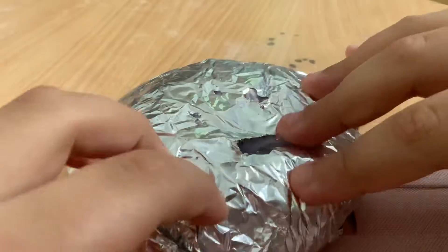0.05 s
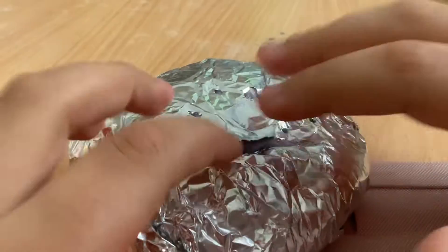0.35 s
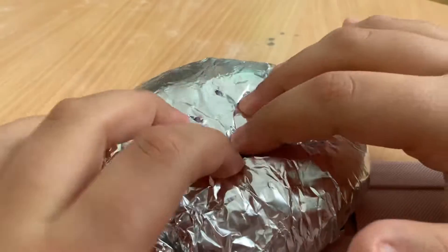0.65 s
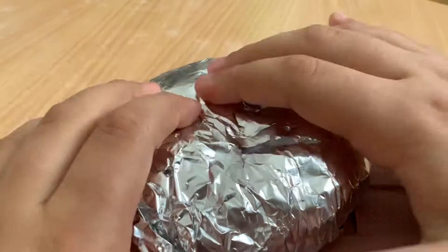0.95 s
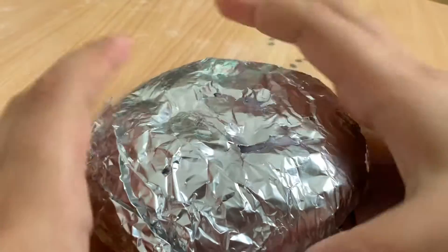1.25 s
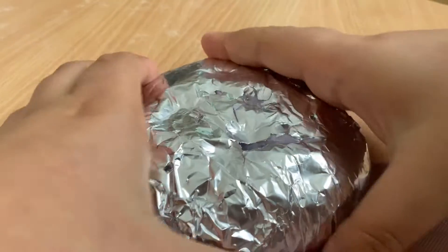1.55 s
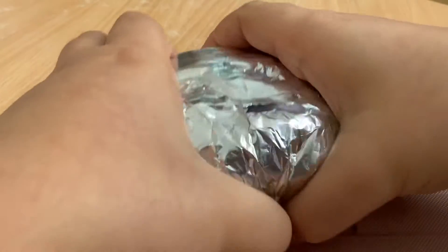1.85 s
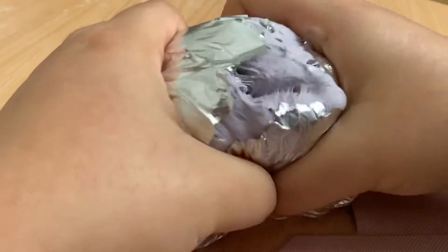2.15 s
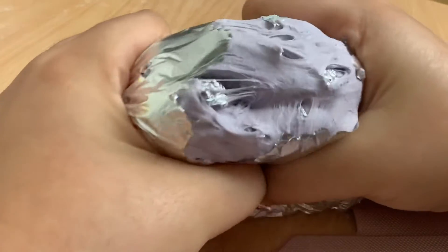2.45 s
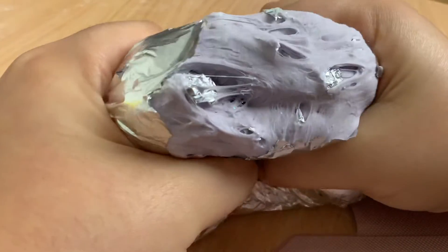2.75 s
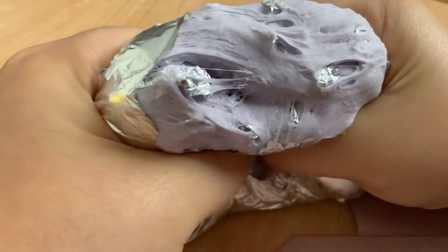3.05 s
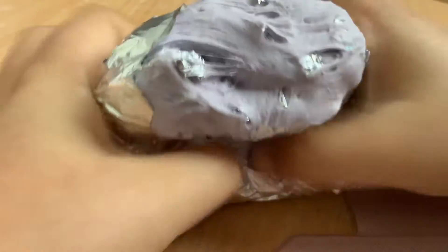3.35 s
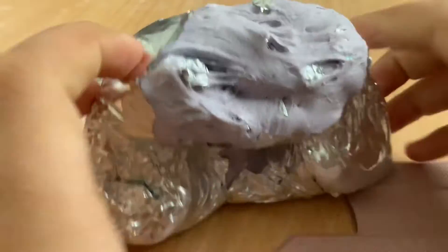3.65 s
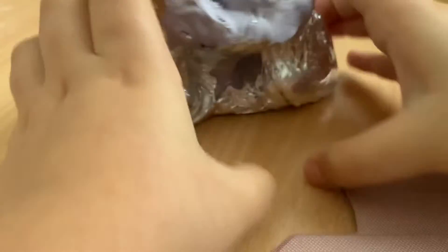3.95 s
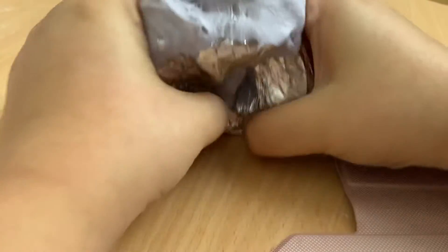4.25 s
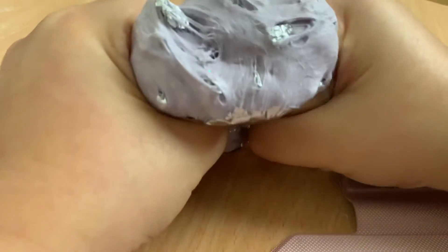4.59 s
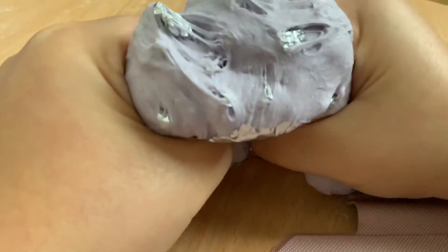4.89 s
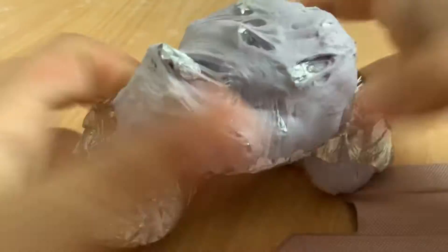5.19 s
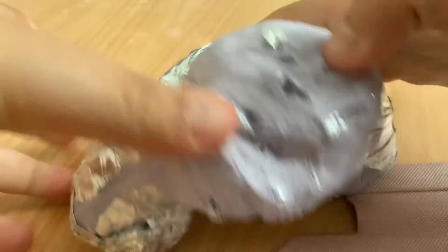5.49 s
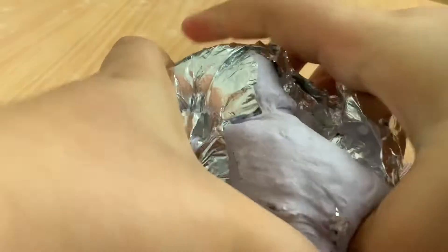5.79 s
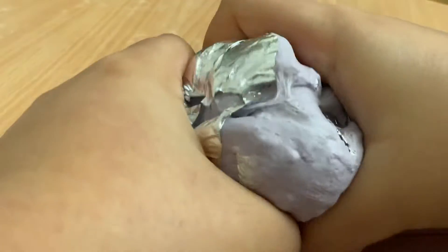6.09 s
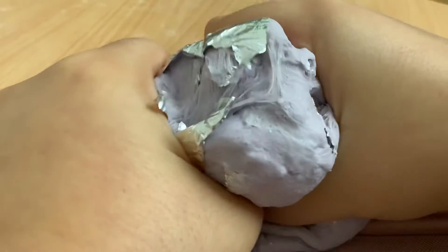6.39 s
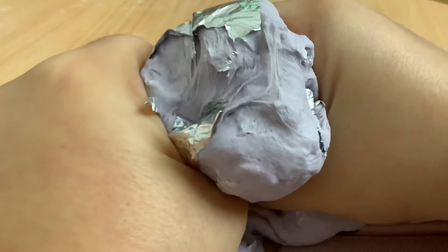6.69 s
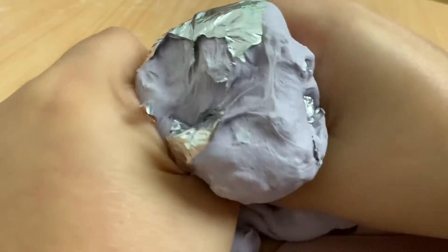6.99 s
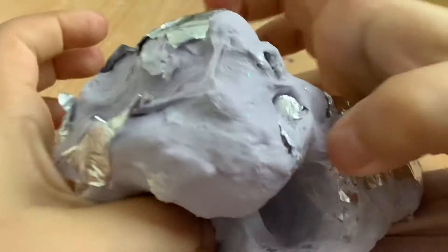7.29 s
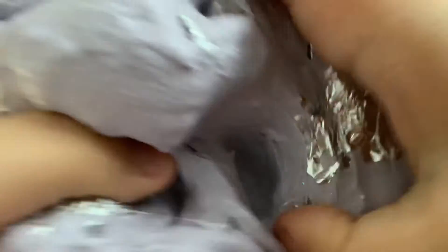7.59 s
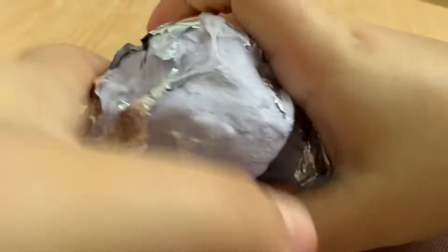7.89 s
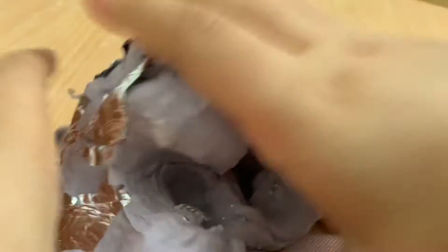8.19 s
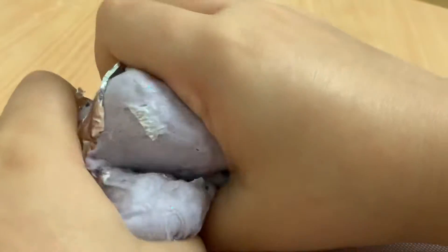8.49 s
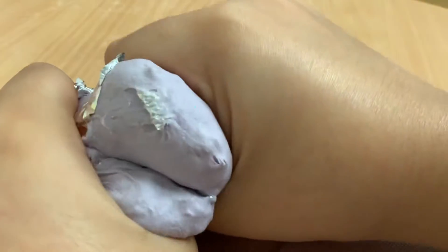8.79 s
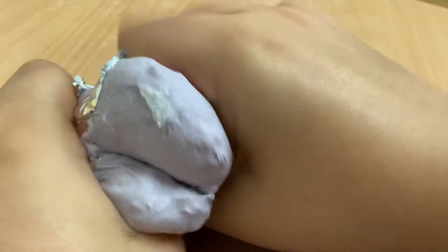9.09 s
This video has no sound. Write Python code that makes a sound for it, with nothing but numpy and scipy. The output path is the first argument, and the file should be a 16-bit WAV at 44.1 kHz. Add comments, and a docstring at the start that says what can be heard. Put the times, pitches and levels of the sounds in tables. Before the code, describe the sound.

Hands squeeze foil-wrapped putty in uneven bursts of bright crinkling and snaps, with soft squelches and dull bumps on a table.

```python
"""Squeezing putty in foil

Two hands squeeze a lump of soft putty wrapped in aluminium foil, close up on a wooden table in a small
room. The foil buckles in bright snaps and showers of tiny creases; early on the wrap is crushed and
bursts, and the bared putty is stretched. Underneath, skin sticks and slips, trapped air squelches out,
and now and then the lump bumps the table."""
import sys
import numpy as np
from scipy import signal
from scipy.fft import rfft, irfft
from scipy.io import wavfile
from scipy.ndimage import uniform_filter1d, map_coordinates

SR = 44100
rng = np.random.default_rng(int(sys.argv[2]) if len(sys.argv) > 2 else 0)


def dump(signal):
    """Clip the signal to [-1, 1] and save it as 16-bit WAV at the path in sys.argv[1]."""
    limited = np.clip(np.atleast_2d(signal).T, -1, 1)
    pcm = np.round(limited * 32767).astype(np.int16)
    wavfile.write(sys.argv[1], SR, pcm)


N = 403074
TIME = np.arange(N) / SR

# Levels in the tables are fader settings; each layer adds its own trim.
# grips of the hands: t/s at full force, closing/s, hold/s, release/s,
# foil level/dB, skin level/dB, putty level/dB, table level/dB, creasing pace/(1/s)
HAND_GRIPS = [(0.047, 0.007, 0.0046, 0.023, -39, -50, -60, -43.5, 420),
              (0.11, 0.055, 0.1, 0.092, -47, -63.5, -79, -59, 310),
              (0.383, 0.11, 0.01, 0.023, -38, -49, -51, -45.5, 930),
              (0.43, 0.017, 0.0054, 0.038, -38.5, -55, -63, -49, 490),
              (0.591, 0.23, 0.078, 0.034, -57, -67, -77, -59.5, 370),
              (0.83, 0.07, 0.0064, 0.04, -39.5, -49, -52, -51, 1400),
              (0.911, 0.01, 0.0076, 0.0099, -40.5, -43.5, -64, -49, 3000),
              (0.941, 0.051, 0.068, 0.16, -50.5, -66, -51.5, -53, 370),
              (1.282, 0.13, 0.012, 0.16, -44, -53.5, -51, -54, 900),
              (1.474, 0.21, 0.028, 0.076, -58.5, -62, -58.5, -57, 11000),
              (1.738, 0.21, 0.08, 0.074, -34.5, -56, -56.5, -62, 1400),
              (1.856, 0.061, 0.13, 0.2, -34, -45.5, -51, -74.5, 4000),
              (2.11, 0.41, 0.33, 0.14, -40, -50.5, -53.5, -54.5, 1400),
              (2.62, 0.37, 0.26, 0.16, -41.5, -51.5, -57, -75, 2000),
              (3.011, 0.041, 0.019, 0.25, -47, -54, -53.5, -66, 1300),
              (3.362, 0.15, 0.031, 0.13, -34, -39.5, -40.5, -43, 4700),
              (3.61, 0.49, 0.0074, 0.11, -52.5, -50, -46.5, -50, 6000),
              (3.758, 0.092, 0.017, 0.13, -32.5, -42.5, -42.5, -55, 19000),
              (3.844, 0.11, 0.06, 0.24, -38.5, -45, -44, -58, 15000),
              (4.083, 0.11, 0.095, 0.092, -53.5, -52.5, -45.5, -67, 11000),
              (4.183, 0.071, 0.15, 0.35, -36.5, -44, -44, -59, 8000),
              (4.41, 0.062, 0.071, 0.17, -41.5, -46, -45.5, -53, 1600),
              (4.624, 0.35, 0.22, 0.33, -40.5, -49.5, -55, -62, 2000),
              (5.096, 0.083, 0.014, 0.23, -37, -44.5, -47, -48.5, 2300),
              (5.409, 0.19, 0.08, 0.079, -42, -37, -33.5, -36, 750),
              (5.598, 0.27, 0.091, 0.075, -36.5, -49.5, -36, -42, 910),
              (5.742, 0.02, 0.14, 0.13, -43, -53.5, -52.5, -49, 1100),
              (5.931, 0.023, 0.2, 0.3, -36.5, -52, -50.5, -68, 3400),
              (6.251, 0.046, 0.16, 0.15, -37, -53, -49.5, -53, 950),
              (6.506, 0.022, 0.22, 0.11, -52, -59.5, -66, -57, 680),
              (6.83, 0.066, 0.18, 0.21, -54.5, -61.5, -65.5, -61, 190),
              (7.046, 0.15, 0.059, 0.22, -39.5, -54, -49.5, -54.5, 5300),
              (7.21, 0.3, 0.19, 0.25, -51.5, -60.5, -57.5, -51, 1740),
              (7.699, 0.054, 0.012, 0.18, -38, -50, -37, -41.5, 1400),
              (7.853, 0.047, 0.0095, 0.37, -44.5, -56, -44.5, -43, 3700),
              (8.032, 0.015, 0.0099, 0.062, -63, -70, -48.5, -45, 2000),
              (8.188, 0.0077, 0.0051, 0.017, -32.5, -57, -49, -58, 12000),
              (8.23, 0.16, 0.096, 0.53, -48.5, -47, -41, -46.5, 5300),
              (8.493, 0.22, 0.058, 0.56, -41.5, -55.5, -70, -52.5, 1200),
              (8.899, 0.021, 0.0086, 0.073, -39, -44, -49.5, -39, 2500),
              (9.136, 0.073, 0.02, 0.075, -35.5, -35, -37.5, -38, 1800)]
# the lump hits the table: t/s, level/dB, start f/Hz, end f/Hz
TABLE_BUMPS = [(0.059, -26.5, 177, 75.5), (0.914, -24.5, 293, 77.4), (1.351, -23.5, 332, 99),
               (2.068, -17.5, 1128, 142), (2.077, -24.5, 204, 120), (2.307, -27, 465, 157),
               (2.566, -26.5, 747, 126), (2.751, -31, 320, 143), (3.431, -28, 697, 178),
               (3.618, -31, 355, 99), (4.478, -21, 633, 141), (5.106, -26, 230, 154),
               (5.186, -26.5, 557, 127), (5.47, -21.5, 252, 130), (5.62, -18.5, 203, 144),
               (5.644, -19.5, 231, 157), (6.287, -23, 407, 68.6), (6.521, -25.5, 237, 139),
               (7.252, -36.5, 414, 68), (7.685, -11, 513, 294), (7.715, -23, 106, 63),
               (8.22, -24, 221, 129)]
# air escapes through a gap: t/s, length/s, level/dB, pocket f/Hz
AIR_SQUELCHES = [(0.378, 0.0033, -45, 940), (0.829, 0.0026, -36.5, 990), (1.288, 0.0016, -27.5, 840),
                 (2.201, 0.016, -34, 1920), (2.566, 0.0031, -33.5, 1150), (3.375, 0.0057, -30, 2000),
                 (3.428, 0.002, -25.5, 1000), (4.406, 0.0054, -18, 1820), (4.41, 0.0029, -23.5, 1030),
                 (4.433, 0.0047, -33, 2100), (5.329, 0.033, -37, 1180), (5.367, 0.0044, -35, 1160),
                 (5.396, 0.0042, -22.5, 1064), (5.397, 0.0051, -26, 1440), (5.408, 0.005, -23.5, 1130),
                 (5.431, 0.027, -32, 1160), (5.454, 0.018, -30, 1140), (5.471, 0.028, -29.5, 1160),
                 (5.561, 0.0085, -40, 1060), (5.577, 0.022, -42.5, 1150), (5.66, 0.0041, -38.5, 1150),
                 (5.74, 0.0058, -47, 1150), (5.825, 0.0031, -37.5, 1250), (7.706, 0.0056, -40.5, 1090),
                 (8.122, 0.047, -41, 1740), (8.123, 0.039, -37.5, 360), (8.161, 0.053, -45.5, 3410),
                 (8.166, 0.011, -31.5, 1880), (8.184, 0.04, -41.5, 1960)]
# the featured buckles of the foil: t/s, level/dB, facet f/Hz, relative midrange pop level/dB
FOIL_SNAPS = [(0.0521, -35.5, 8500, -25), (0.0707, -32, 12100, -42), (0.1245, -32.5, 8450, -37),
              (0.1312, -31, 10500, -26), (0.1332, -29.5, 7850, -20), (0.1751, -34.5, 7860, -31),
              (0.1997, -36, 8000, -35), (0.2078, -24, 9570, -47), (0.229, -32.5, 12600, -30),
              (0.321, -33, 10700, -37), (0.3436, -41, 7560, -32), (0.4976, -39, 8700, -20),
              (0.5238, -21.5, 12970, -42), (0.5698, -37, 9700, -27), (0.5866, -45, 9600, -20),
              (0.6868, -50, 8340, -14), (0.7773, -41, 7960, -40), (0.79, -32.5, 11700, -47),
              (0.829, -30.5, 9710, -30), (0.9505, -32.5, 7400, -33), (0.9952, -32.5, 10450, -37),
              (1.0534, -36.5, 11800, -18.5), (1.2155, -41, 9200, -14), (1.2714, -35.5, 11450, -18),
              (1.2896, -32, 9300, -1.5), (1.35, -49.5, 9600, -10), (1.6635, -40, 11200, -35),
              (1.6906, -41, 10800, -25), (1.7162, -28.5, 10200, -19), (1.7472, -23, 10240, -25),
              (1.7528, -28, 9700, -24), (1.7617, -24, 9100, -18), (1.7794, -31, 9200, -21),
              (1.8024, -26.5, 9100, -1), (1.8262, -26, 8400, -29), (1.8429, -28, 8950, -18),
              (1.8489, -20, 8400, -9), (1.8794, -26, 9400, -19), (1.8891, -24.5, 9200, -4.5),
              (1.9255, -25, 9900, -17), (1.9334, -24, 9500, -22), (1.9369, -19.5, 9900, -8),
              (1.9558, -22, 9500, -7), (1.9608, -14, 10600, -15.5), (1.9637, -27, 9400, -2.5),
              (1.9675, -18, 10300, -10.5), (1.9921, -22, 10100, -12), (2.009, -24, 9100, -33),
              (2.0197, -30, 9000, -21), (2.0284, -18, 8350, -21), (2.0512, -27, 10400, -23),
              (2.0684, -24, 8050, -8), (2.081, -22.5, 9350, -37), (2.1117, -33, 8850, -16),
              (2.1627, -27, 10000, -40), (2.1774, -23.5, 11300, -12.5), (2.2231, -37, 12100, -20),
              (2.234, -30, 8640, -5.5), (2.3117, -22, 8460, -13), (2.3263, -23, 14000, -32),
              (2.35, -32, 12000, -12), (2.3626, -25, 9200, -15), (2.4156, -28, 11700, -27),
              (2.4951, -31.5, 6060, 1.5), (2.5045, -37.5, 11100, -4), (2.5684, -32.5, 9500, 2),
              (2.6603, -31.5, 14400, -12), (2.6896, -38, 9800, -16), (2.7925, -40, 11900, -18),
              (2.8504, -33.5, 10820, -21), (2.9638, -34.5, 10600, -26), (2.9747, -34.5, 9900, -9),
              (3.0411, -37, 10300, -24), (3.079, -30.5, 13000, -28), (3.4219, -25, 9400, -9),
              (3.431, -25, 8300, -1), (3.6016, -24, 10200, -20), (3.611, -29, 9200, -17),
              (3.6554, -27, 8240, -23), (3.7024, -35.5, 11000, -18), (3.9836, -36, 11000, -27),
              (4.1647, -29, 9450, -23), (4.2897, -29.5, 12000, -11), (4.3802, -28, 8900, -11),
              (4.404, -21, 11100, -16), (4.5216, -41, 9000, 2.5), (4.5617, -35, 11500, -22),
              (4.6135, -25, 12100, -7), (4.6297, -28, 12000, -31), (4.6575, -29, 10800, -10),
              (4.6814, -21, 10860, -20), (4.6917, -37, 10800, -13), (4.7082, -40, 11000, -20),
              (4.732, -22, 12500, -30), (4.7554, -43.5, 7450, 5), (4.8331, -31.5, 7800, -14),
              (4.8608, -36, 10000, -6), (4.8827, -39, 7030, -5), (4.963, -37, 8000, -28),
              (5.0423, -39, 10970, -29), (5.106, -34, 12000, -25), (5.1645, -46, 6700, -4),
              (5.1697, -32, 9900, -6), (5.3962, -25, 6370, -2.5), (5.5588, -32, 8860, -24),
              (5.611, -27, 10600, -16), (5.6241, -36, 10900, -25), (5.6528, -26, 11200, -31),
              (5.6737, -32, 11100, -13), (5.7786, -36, 10200, -25), (5.826, -38, 11800, -16),
              (5.8875, -35.5, 11740, -25), (5.9122, -27.5, 9300, -17), (5.9205, -30, 12100, -20),
              (5.9382, -35, 11000, -15), (6.0238, -42, 9900, -25), (6.0717, -39, 10900, 3.5),
              (6.2535, -25.5, 11100, -12.5), (6.3048, -30, 12200, -32), (6.312, -22, 9800, -8.5),
              (6.3659, -25, 9600, -6.5), (6.373, -25.5, 9700, -6), (6.3945, -31, 11300, -11),
              (6.4342, -28.5, 11300, -10.5), (6.5064, -27.5, 11000, -15), (6.5119, -34.5, 8850, 7),
              (6.6057, -33.5, 11700, -11), (6.6734, -38, 5400, -9.5), (6.8436, -43.5, 9900, -7),
              (7.0323, -35, 12000, -9), (7.0928, -31, 8950, -10), (7.1126, -32.5, 5300, -19),
              (7.5327, -32, 13330, -22), (7.555, -41, 5100, -16), (7.9015, -38, 10500, -14),
              (7.9614, -48, 8500, -17), (8.018, -32, 10950, -9), (8.3807, -41.5, 9500, -28),
              (8.5512, -31, 9600, -20), (8.6429, -34.5, 6530, -8), (8.7771, -40.5, 11000, -26),
              (9.121, -28.5, 8360, -13)]
# fader moves for the bursting wrap and the stretching putty: t/s, level/dB
CRUSH_FADER = [(1.68, -56), (1.74, -38), (1.86, -29.5), (1.97, -27.5), (1.985, -45), (2.035, -21.5),
               (2.06, -38), (2.12, -30), (2.17, -66)]
STRETCH_FADER = [(2.42, -53), (2.55, -44), (2.6, -40.5), (2.72, -45), (2.79, -42.5), (2.93, -58.5),
                 (3.03, -51.5), (3.16, -63)]
# EQ curves of room tone, crinkle and snaps: f/Hz, level/dB
ROOM_TONE_EQ = [(25, -7), (60, -10), (150, -9), (400, -18), (1000, -33), (2700, -35), (6000, -35),
                (16000, -34.5)]
CRINKLE_EQ = [(300, -52), (1000, -9), (1800, -0.5), (2700, 0.5), (3700, 1), (5000, 0.5), (7000, 0.5),
              (9000, 3), (11500, 2.5), (15500, -2.5), (16500, -37)]
SNAP_EQ = [(300, -6.5), (1000, -1), (2000, -9), (2700, -3), (3800, 4), (5500, 1.5), (9000, 0.5),
           (16000, 3.5)]
# resonances of table, putty, gaps under the skin, cupped hands and closed wrap: f/Hz, width/Hz, level/dB
TABLE_RESONANCES = [(50, 28, -5.5), (68.5, 21.6, -1.3)]
PUTTY_RESONANCES = [(164, 24, -1), (239.5, 14, -6), (317, 44, -4.5)]
GAP_RESONANCES = [(537, 113, 7), (879, 110, 3.5), (1029, 158, 4), (1613, 214, 7.5), (1750, 437, 7.5),
                  (1997, 800, 1)]
CUP_RESONANCES = [(315, 37, -0.5), (543, 30, 1.5), (836, 35, -1), (1006, 62, -9), (1200, 44, -6),
                  (1780, 65, -7.5), (1980, 120, -4.5), (2110, 760, -6.5)]
WRAP_RESONANCES = [(990, 110, -5.5), (2140, 660, -6), (3680, 400, -4.5), (6740, 410, -5), (8150, 700, 0),
                   (9550, 860, -1.5), (10800, 1000, -9.5), (13500, 3000, -9)]
# partials of an air pocket: multiple of its pitch, level/dB
POCKET_PARTIALS = [(1, 10), (2, -5.5)]

TOP_HZ = 15900  # upper edge of the mix
SLIDING_PACE = 1900  # at this pace the foil starts to slide: half as many chance buckles


def from_db(db):
    """Decibels to gain."""
    return 10 ** (np.asarray(db) / 20)


def rms_one(x):
    """Scale to rms 1."""
    return x / np.sqrt(np.mean(x ** 2) + 1e-20)


def add(track, s, sound):
    """Drop a short sound onto a track at s seconds."""
    i = max(round(s * SR), 0)
    track[..., i:i + sound.shape[-1]] += sound[..., :max(N - i, 0)]


def cut(x, hz, kind, order=2):
    """Butterworth filter; kind names the band that passes."""
    return signal.sosfilt(signal.butter(order, np.clip(hz, 10, .49 * SR), kind, fs=SR, output="sos"), x)


def resonate(x, hz, width_hz):
    """One resonance, unity gain at its peak."""
    r = np.exp(-np.pi * width_hz / SR)
    feedback = [1, -2 * r * np.cos(2 * np.pi * hz / SR), r * r]
    return signal.lfilter(np.array([1, 0, -1]) * (1 - r * r) / 2, feedback, x + 1e-18)


def body(x, modes):
    """Parallel resonances of alternating polarity; rms 1."""
    return rms_one(sum((-1) ** k * from_db(db) * resonate(x, hz, width)
                       for k, (hz, width, db) in enumerate(modes)))


def equalise(x, curve, size=2048):
    """Minimum-phase EQ, its curve drawn on a log-frequency axis."""
    hz, db = np.transpose(curve)
    bins_hz = np.maximum(np.fft.rfftfreq(size, 1 / SR), 1)
    gain = from_db(np.interp(np.log(bins_hz), np.log(hz), db))
    cepstrum = irfft(np.log(gain))
    cepstrum[1:size // 2] *= 2
    cepstrum[size // 2 + 1:] = 0
    impulse = irfft(np.exp(rfft(cepstrum)))
    return signal.fftconvolve(x, impulse[None], axes=-1)[:, :x.shape[-1]]


def bend(x, pitch_ratio):
    """Varispeed: shift all resonances by a moving ratio."""
    position = np.cumsum(pitch_ratio)
    return np.array([map_coordinates(side, [position], order=1, mode="mirror") for side in x])


def fader(points):
    """Gain from (t/s, level/dB) points; silent outside them."""
    s, db = np.transpose(points)
    return from_db(np.interp(TIME, s, db, left=-120, right=-120))


def drift(per_s):
    """A slow random wander, roughly between -1 and 1."""
    return np.interp(TIME * per_s, np.arange(1000), rng.standard_normal(1000))


def stereo_noise(length, side_db):
    """Mid/side white noise; side_db sets the width."""
    mid, side = rng.standard_normal((2, length))
    return (mid + from_db(side_db) * side * [[1], [-1]]) / np.hypot(1, from_db(side_db))


def grain_power(per_s, spread_db, decay_s, even_s):
    """Power of fast-dying random grains, many small and a few big, levelled to about 1 over even_s."""
    chance = rng.random(N) * SR / per_s
    born = chance < 1
    strength = np.minimum(-np.log(chance[born] + 1e-12), 4)
    power = np.zeros(N)
    power[born] = from_db(spread_db * strength) ** 2
    power = signal.lfilter([1], [1, -np.exp(-2 / (decay_s * SR))], power + 1e-12)
    return power / np.maximum(uniform_filter1d(power, int(even_s * SR) + 1), 1e-9)


def room_tone():
    """The bed: faint, steady rumble and hiss."""
    return from_db(-59.5) * rms_one(equalise(stereo_noise(N, side_db=-12), ROOM_TONE_EQ))


def room(x, wet_db, t60_s=0.07):
    """Add a tight wash of reflections, different in each ear, just behind the direct sound."""
    t = TIME[:SR // 2]
    fade_in = np.clip(t / 0.0017 - .5, 0, 1)
    tail = rng.standard_normal((2, len(t))) * from_db(-60 * t / t60_s) * fade_in
    tail = rms_one(tail) / np.sqrt(len(t))
    return x + from_db(wet_db) * signal.fftconvolve(x, tail, axes=-1)[:, :N]


def grips(yield_db_per_s=12):
    """Grips close, hold while the lump yields, and let go: foil, skin, putty and table gains, and pace."""
    power, weighted_pace = np.zeros((4, N)) + 1e-12, np.zeros(N)
    for s, closing_s, hold_s, release_s, *levels_db, pace in HAND_GRIPS:
        start = max(s - closing_s, 0)
        t = np.arange(start - s, hold_s + release_s, 1 / SR)
        attack = np.clip(1 + t / closing_s, 0, 1)
        release = np.clip(1 - (t - hold_s) / release_s, 0, 1)
        force = (attack * release) ** 2 * from_db(-yield_db_per_s * np.clip(t, 0, hold_s))
        grip_power = np.outer(from_db(levels_db), force) ** 2
        add(power, start, grip_power)
        add(weighted_pace, start, grip_power[0] * pace)
    return *np.sqrt(power), np.maximum(weighted_pace / power[0], 200)


def knead(putty_gain, table_gain):
    """The low end: dull pushes sound in the putty and set the table rumbling."""
    pushes = np.sqrt(grain_power(130, spread_db=2.5, decay_s=0.0071, even_s=0.32))
    putty = body(stereo_noise(N, side_db=-13) * pushes, PUTTY_RESONANCES)
    putty = rms_one(cut(cut(putty, 414, "low", order=3), 75, "high"))
    table = body(stereo_noise(N, side_db=-11.5) * (pushes + 0.26), TABLE_RESONANCES)
    table = rms_one(cut(table, 96, "low"))
    pan = from_db([[.6], [-.6]])
    return (putty_gain * from_db(0.5) * putty + table_gain * from_db(-0.5) * table) * pan


def bumps(size=6000):
    """A soft, uneven blow spreads as a bending wave: highs arrive first, then the putty rings briefly."""
    thuds, t = np.zeros(N), np.arange(size) / SR
    for s, db, start_hz, end_hz in TABLE_BUMPS:
        swell_s = 0.00801 * (308 / start_hz) ** 0.441  # a harder bump starts higher and swells faster
        hz = end_hz + (start_hz - end_hz) * np.exp(-t / (0.933 * swell_s))
        swell = np.sqrt(t / swell_s * np.exp(1 - t / swell_s)) * np.exp(-t * 25)
        wobble, roughness = rms_one(cut(rng.standard_normal((2, size)), start_hz * .4, "low"))
        wave = np.sin(2 * np.pi * np.cumsum(hz) / SR + .7 * wobble) * (1 + .45 * roughness)
        add(thuds, s, from_db(db) * cut(swell * wave, start_hz * 1.38, "low", order=3))
    ring = sum(resonate(thuds, hz, width * 0.25) for hz, width, _ in PUTTY_RESONANCES)
    pan = from_db([[.7], [-.7]])
    return (from_db(-4.5) * thuds + from_db(-10) * ring) * pan


def hollows(x, modes, wander=.025):
    """Hollows in the hands ring; their pitch wanders as the fingers change their size."""
    return bend(body(x, modes), 1 + wander * drift(per_s=7))


def rub(gain):
    """Skin sticks and slips; the slips sound in the gaps between hands and lump."""
    noise = stereo_noise(N, side_db=-4)
    slips = noise * np.sqrt(grain_power(570, spread_db=3.5, decay_s=0.0036, even_s=0.15))
    muffled = cut(hollows(slips, GAP_RESONANCES), 4400, "low", order=4)
    return gain * from_db(1.74) * rms_one(cut(muffled, 300, "high"))


def stretch():
    """Tiny bubbles tear in the stretching putty and ring the cupped hands."""
    noise = stereo_noise(N, side_db=-7.5)
    tears = noise * np.sqrt(grain_power(400, spread_db=2, decay_s=.002, even_s=0.11))
    return fader(STRETCH_FADER) * rms_one(cut(hollows(tears, CUP_RESONANCES), 3000, "low"))


def squelches(size=4000, pops_per_s=700, width_hz=380, glide=0.018, glide_s=0.014):
    """Air bursts through a sticky gap, sputters out and rings the pocket behind it."""
    out, t = np.zeros((2, N)), np.arange(size) / SR
    rising_pitch = 1 + glide * (.5 - np.exp(-t / glide_s))  # the pocket shrinks as it empties
    for s, length_s, db, hz in AIR_SQUELCHES:
        pops = (rng.random(size) < pops_per_s / SR) * rng.standard_normal(size)
        sputter = pops + from_db(-13.5) * stereo_noise(size, side_db=-8)
        sputter[:, 0] += 2  # the gap breaks open
        flow = sputter * np.exp(-(t / length_s) ** 2)
        ring = sum(from_db(partial_db) * resonate(resonate(flow, hz * k, width_hz), hz * k, width_hz)
                   for k, partial_db in POCKET_PARTIALS)
        ring = rms_one(bend(ring, rising_pitch))
        add(out, s, from_db(db + 2.5) * ring * np.sqrt(length_s * SR / size))
    return out


def facets(x, size=2048, ring_db=2):
    """As the fingers free and damp them, ever new patches of foil ring briefly, each at its own pitch."""
    ring = np.zeros((2, N))
    for i in range(0, N - size, size // 2):
        hz = rng.uniform(4000, 15000)
        add(ring, i / SR, resonate(x[:, i:i + size], hz, width_hz=220) * np.hanning(size))
    return rms_one(x + from_db(ring_db) * ring)


def crush():
    """The big crunch: creases give way in a dense run and ring the taut, still closed wrap."""
    noise = stereo_noise(N, side_db=-11)
    creases = noise * np.sqrt(grain_power(400, spread_db=3.5, decay_s=0.0017, even_s=0.026))
    return fader(CRUSH_FADER) * facets(cut(body(creases, WRAP_RESONANCES), 500, "high"))


def crinkle(gain, pace, sliding_treble_db=2):
    """Showers of tiny creases: ticks of the whole sheet over a fine rustle, a swish when fast."""
    grains_per_s = pace * .3
    ticks = grain_power(grains_per_s, spread_db=7, decay_s=.0009, even_s=.13)
    swish = 2.5 * (pace / (pace + 6000)) ** 2
    edges_hz, shower = (300, 2800, 5000, 7500, 10000, 13000, 17000), 0
    for band_hz in zip(edges_hz, edges_hz[1:]):
        rustle = grain_power(grains_per_s, spread_db=5.5, decay_s=.003, even_s=.07)
        power = ticks + .4 * rustle + swish + .02
        shower += cut(stereo_noise(N, side_db=-19) * np.sqrt(power), band_hz, "band", order=3)
    shower = facets(equalise(shower, CRINKLE_EQ))
    sliding = pace / (pace + SLIDING_PACE)  # sliding foil makes finer, brighter creases
    sheen = cut(shower, 6200, "high", order=1) * (from_db(sliding_treble_db) - 1) * sliding
    flicker = from_db(-1.5 + 2 * drift(per_s=14))
    return gain * flicker * (shower + sheen)


def chance_buckles(foil_gain, pace, candidates=300, max_per_s=17):
    """Filler rows like FOIL_SNAPS: buckles at random moments, as loud as the grip makes them."""
    when, chance = rng.random((candidates, 2)).T
    softness, octaves, pop = rng.standard_normal((candidates, 3)).T
    i = (when * N).astype(int)
    db = 20 * np.log10(foil_gain[i]) + 1 - 3 * np.minimum(softness, 1)
    hz = 10100 * 2 ** (0.13 * octaves)
    pop_db = -8.5 + 6 * pop
    per_s = max_per_s / (1 + pace[i] / SLIDING_PACE)
    rows = np.transpose([i / SR, db, hz, pop_db])
    return list(rows[chance < per_s * N / SR / candidates])


def snaps(rows, size=700, mode_count=4, crack_s=.00045, shiver_s=.003):
    """A facet flips in two quick cracks and rings with its own modes; the sheet around it pops lower."""
    out, t = np.zeros((2, N)), np.arange(size) / SR
    first_crack = np.exp(-t / crack_s)
    shiver = from_db(-22) * np.exp(-t / shiver_s)
    attack = np.minimum(t / .00015, 1)
    for s, db, hz, pop_db in rows:
        late = t - rng.uniform(.0002, .0012)
        second_gain = from_db(min(rng.normal(-1.5, 6), 0))
        second_crack = second_gain * (late > 0) * np.exp(-np.abs(late) / crack_s)
        burst = stereo_noise(size, side_db=-10.5) * (first_crack + second_crack + shiver) * attack
        modes_hz = hz * 2 ** rng.normal(0, .3, mode_count)
        modes_hz = np.minimum(modes_hz, TOP_HZ * rng.uniform(.85, .98, mode_count))
        ring = rms_one(sum(resonate(burst, mode_hz, width_hz=280) for mode_hz in modes_hz))
        crack = rms_one(resonate(burst, min(hz, TOP_HZ), width_hz=1100) + from_db(-27.5) * burst)
        facet = rms_one(cut(ring + from_db(-2.5) * crack, [hz * 0.43, hz * 2.15], "band", order=3))
        pop = rms_one(cut(resonate(burst, 1950, width_hz=550), 8000, "low"))
        add(out, s, from_db(db - 6.5) * (facet + from_db(pop_db + 6) * pop))
    return equalise(out, SNAP_EQ)


def scene():
    """The mix: nearly dry foil up front, roomier hands behind, kneading and room tone below."""
    foil_gain, skin_gain, putty_gain, table_gain, pace = grips()
    bed = room_tone()
    hands = rub(skin_gain) + stretch() + squelches() + bumps()
    hands = room(hands, wet_db=-9)
    lump = knead(putty_gain, table_gain)
    foil = crinkle(foil_gain, pace) + crush()
    foil += snaps(list(FOIL_SNAPS) + chance_buckles(foil_gain, pace))
    return bed + lump + hands + room(foil, wet_db=-20)


def record(dry):
    """Two microphone ports colour the mids differently; peaks are rounded, subs and top rolled off."""
    left, right = cut(dry, 47, "high", order=4)
    left = left + 0.99 * resonate(left, 1010, width_hz=304)
    right = right - 0.95 * resonate(right, 860, width_hz=366)
    left = left - 2 * resonate(left, 2702, width_hz=1380)  # all-pass: the left mids lag
    rounded = 1.1 * np.tanh(np.array([left, right]) / 1.1)
    return signal.sosfilt(signal.ellip(10, .1, 80, TOP_HZ, fs=SR, output="sos"), rounded)


dry = scene()
out = record(dry)
dump(out)
```